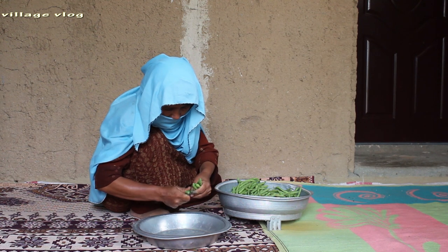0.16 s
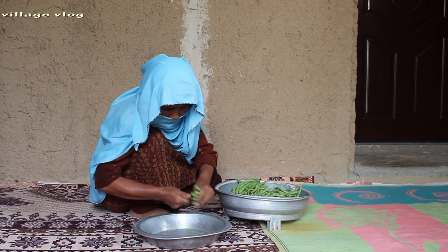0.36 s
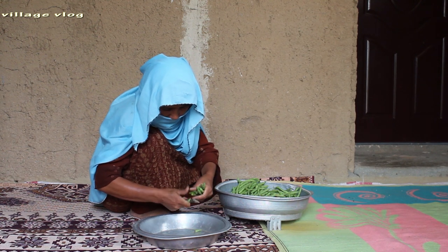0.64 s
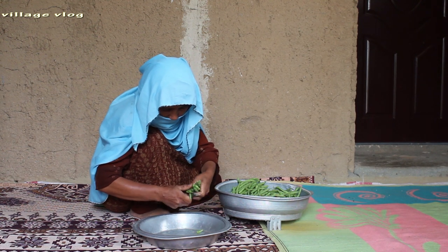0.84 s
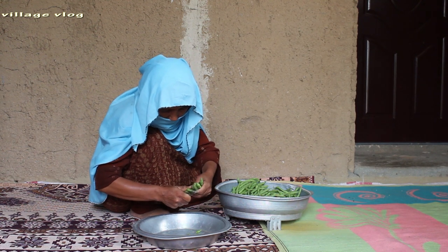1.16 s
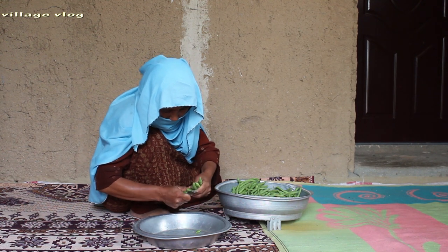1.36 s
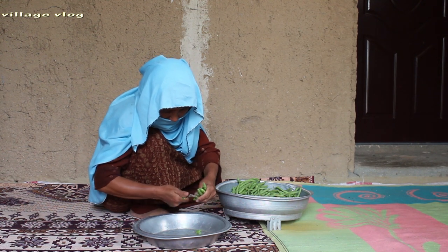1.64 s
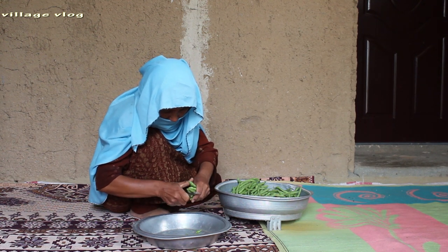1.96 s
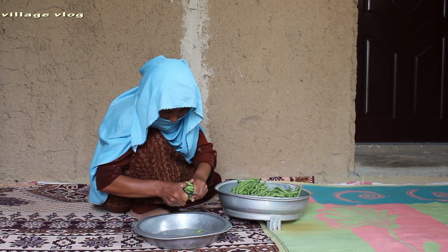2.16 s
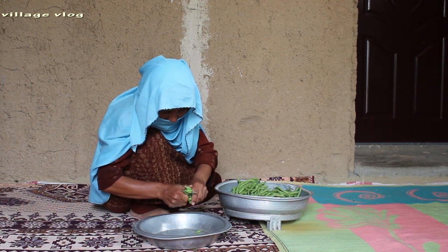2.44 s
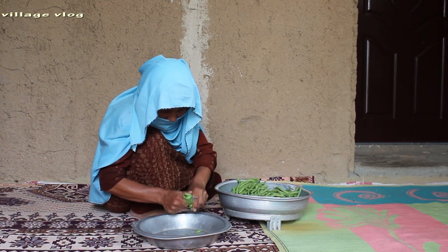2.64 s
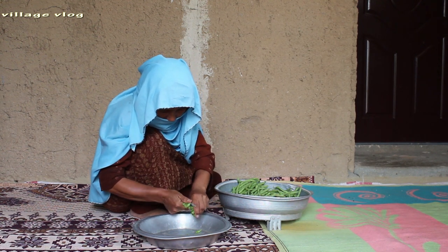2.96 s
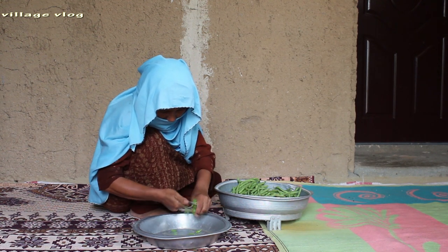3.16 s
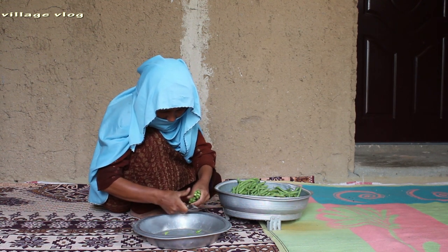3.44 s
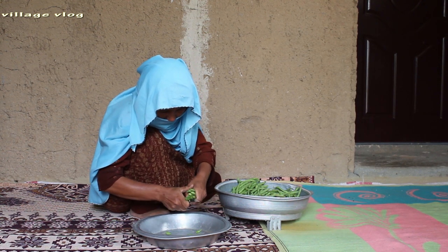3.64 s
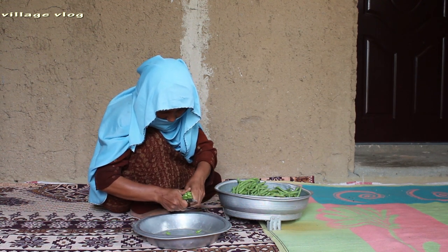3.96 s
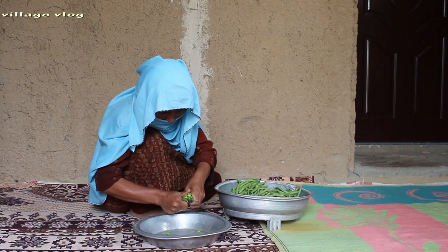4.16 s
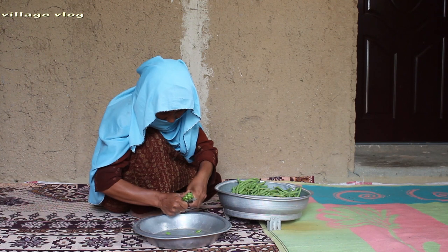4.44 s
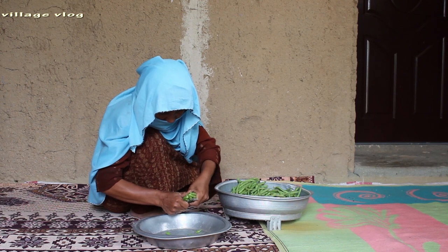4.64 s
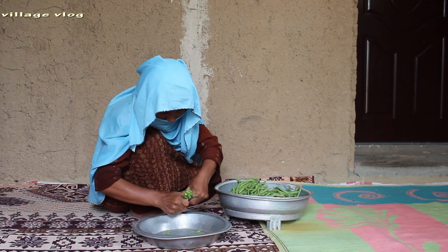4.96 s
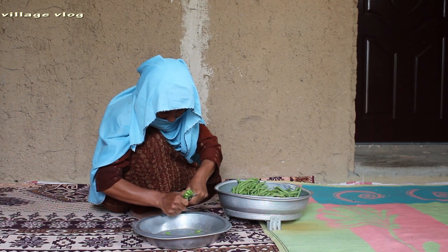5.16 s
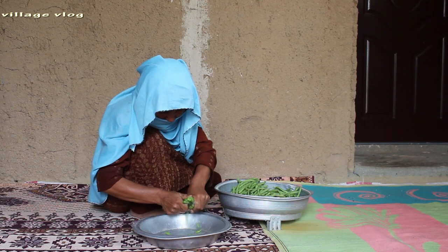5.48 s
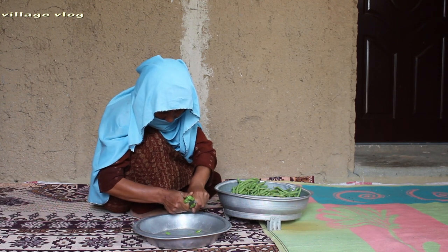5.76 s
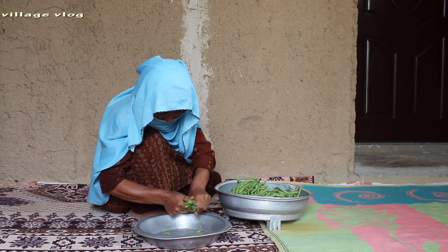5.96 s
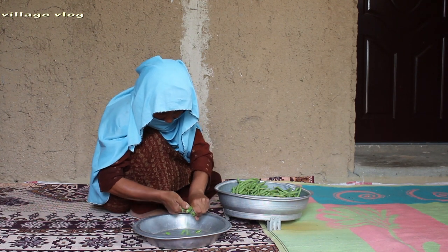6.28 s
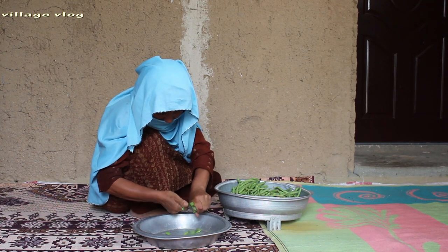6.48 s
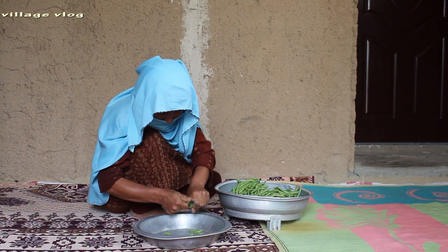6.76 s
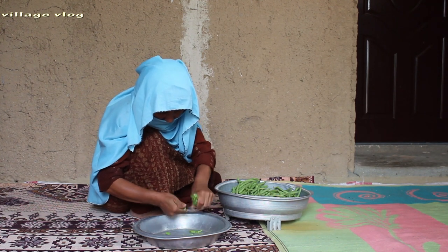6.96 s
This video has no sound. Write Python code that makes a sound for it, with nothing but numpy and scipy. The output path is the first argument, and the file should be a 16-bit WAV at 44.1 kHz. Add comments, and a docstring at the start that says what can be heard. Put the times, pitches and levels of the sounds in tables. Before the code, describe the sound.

Close, quiet outdoor porch ambience with soft air and light hiss. From 0.2 to 0.5 s several small crisp bean cracks, then a piece clinks into a wide thin metal bowl, with weak bounces and a brighter tick at 1.2. One snap at 1.5 precedes firmer hollow metallic landings at 1.65 and 1.9. A faint far motor hum wavers until about 3.8, and a tiny falling chirp comes at 2.1. Cracks gather from 2.4, a strong snap at 2.84 followed at once by the loudest clang, then cuts and tumbling pieces until 3.7, with a soft low rumble near 3.4. A lull holds a faint chirp at 3.9 and small snaps around 4.2. Crisp cuts resume at 5.1, with a solid ring at 5.3 and bounces to 5.8; a dim chirp and more cracks follow, then landings at 6.4 and 6.8. Rings are short and damped.

```python
"""A wide metal bowl rings as pieces of hand-cut green bean drop in: shared modes plus a crowd of weak ones.
Above it each pod cracks at the knife: a click and a noise burst through a broad resonance, with porch echoes.
Small fibre ticks surround the cuts. Behind lie shaped-noise air and hiss, a wavering far motor hum,
one low rumble swell and three faint, falling bird chirps."""
import sys
import numpy as np
from scipy import signal
from scipy.fft import rfft, irfft
from scipy.io import wavfile

SR = 44100
rng = np.random.default_rng(int(sys.argv[2]) if len(sys.argv) > 2 else 0)


def inscribe(sig):
    """Save sig as 16-bit PCM at rate SR to the path in sys.argv[1].

    A 1-D sig is mono; a 2-D sig holds one channel per row.
    Samples are clipped to [-1, 1] before scaling.
    """
    pcm = np.round(np.clip(np.atleast_2d(sig).T, -1, 1) * 32767)
    wavfile.write(sys.argv[1], SR, pcm.astype(np.int16))


N = 313551

# Air and hiss spectrum: (frequency [Hz], relative level [dB])
AIR_SPECTRUM = [(15, -36), (30, -2), (50, -3.5), (90, 6), (130, 1.5), (330, 4), (700, 1), (1100, -0.5),
                (2000, -2), (3200, -3.5), (6000, -7.5), (10000, -12), (15800, -10.5)]
# Air and hiss width: (frequency [Hz], side minus mid [dB])
AIR_SIDE = [(40, -40), (120, -21.5), (300, -22.5), (1000, -24), (2500, -20.5), (6000, -10), (10000, -5.5),
            (15000, -6)]
# Far motor before MOTOR_TRIM_DB: (time [s], level [dB])
MOTOR_ENVELOPE = [(0.1, -73), (1.51, -64), (2.09, -68), (2.39, -60), (2.58, -70), (3.53, -70), (3.88, -84),
                  (3.9, -96)]
# Falling chirps of a far bird, before trim: (time [s], level [dB], length [s])
BIRD_CHIRPS = [(2.148, -43.5, 0.061), (3.891, -47.5, 0.11), (5.891, -46.5, 0.094)]
# Porch tail colour: (frequency [Hz], gain [dB])
PORCH_GAIN = [(200, 1.4), (700, 6), (2500, 8.4), (5000, 3.8), (9000, 2), (15000, 3.7)]
# Porch tail decay: (frequency [Hz], t60 [s])
PORCH_T60 = [(300, 0.51), (2500, 0.26), (7000, 0.27), (14000, 0.22)]
# Colour shared by all cracking pods: (frequency [Hz], gain [dB])
POD_GAIN = [(150, -20), (500, -6.5), (1200, -11), (2200, -6), (4000, -3.5), (7000, -4), (15000, -6.5)]
# Pods cracking, before level and treble trims:
# (time [s], level [dB], crack pitch [Hz], treble [dB], nominal tearing time [ms])
POD_CUTS = [(0.179, -40.5, 3470, -6, 5.1), (0.302, -43.5, 4060, 4, 4), (0.3459, -51, 5000, 7, 2.1),
            (0.4227, -43, 4070, 1, 1.4), (0.4498, -45.5, 2960, -7, 1.7), (1.508, -40, 7960, 8, 8.8),
            (2.3607, -45, 7400, -6, 3.4), (2.4525, -43.5, 8600, -4, 6.5), (2.49, -44.5, 6040, 1, 4.1),
            (2.642, -42, 3230, -5, 2.4), (2.7247, -37, 7700, -4.5, 3.4), (2.8174, -49, 7400, 20, 2.4),
            (2.8448, -27, 3550, 2, 3.3), (3.0272, -47, 3480, 1, 0.81), (3.0631, -38.5, 2090, -9, 8),
            (3.08, -37, 2100, 11, 2.8), (3.1003, -38, 4500, -24, 0.78), (4.1223, -42, 2130, -20, 0.88),
            (4.185, -49, 4400, 1, 1.7), (4.226, -42.5, 4570, 4, 5.5), (5.1216, -40, 7800, 8, .83),
            (5.177, -36, 4400, 2.5, 1.5), (5.227, -34, 3640, -3, 0.97), (5.304, -35, 7200, -2, 0.73),
            (5.472, -43, 8100, -4.5, 0.33), (5.9747, -35.5, 6900, -2.5, 5.5), (6.203, -35, 3980, -9, 1.7),
            (6.276, -42, 5900, 0, 3.9), (6.285, -39.5, 6000, -10, 3), (6.3463, -43, 3460, 3, 1.2)]
# Pieces landing or bouncing in the bowl:
# (time [s], level [dB], contact time [ms], low-end weight [dB], pitch favoured by the spot [Hz])
BOWL_LANDINGS = [(0.461, -25.5, 0.87, -4.5, 940), (0.659, -40, 1.31, -24, 690),
                 (0.785, -36.5, 0.17, -1, 1790), (0.892, -41.5, 0.36, -7, 1790),
                 (1.203, -35.5, 0.36, -7.5, 3680), (1.21, -29, 0.13, -12.5, 3340),
                 (1.651, -25, .63, -14, 700), (1.672, -21.5, 0.91, -7, 677), (1.819, -39, 1.7, -21, 653),
                 (1.862, -40, 0.38, 3, 1570), (1.924, -24.5, 0.69, -6, 1106), (2.115, -36.5, 0.73, -1, 734),
                 (2.868, -26.5, 0.042, -2, 1490), (2.875, -14, 0.43, -10, 1480),
                 (3.055, -25, 0.47, -16, 1250), (3.105, -31, 0.7, 3, 704), (3.184, -23.5, 1.01, -16.5, 656),
                 (3.256, -32, 1.9, -28, 690), (3.335, -35, 0.25, 7, 665), (3.353, -27, 0.85, -27, 766),
                 (3.373, -30.5, 0.11, 10, 1740), (3.457, -40.5, 0.69, 7, 740),
                 (3.495, -39.5, 0.31, 7, 1230), (3.617, -48, 0.57, -8, 700), (3.714, -51.5, 1.84, -17, 710),
                 (5.287, -19.5, 0.83, -15, 704), (5.408, -30.5, 1.02, -1, 690),
                 (5.507, -26, 0.89, -30, 1240), (5.64, -31.5, 2.11, -26, 650),
                 (5.677, -30.5, 0.46, -12, 1290), (5.833, -36, 0.64, -7, 1200),
                 (6.377, -20.5, 1.2, -19, 703), (6.439, -27.5, 0.86, -44, 680),
                 (6.517, -36, 1.97, -11, 714), (6.593, -34, 0.64, -41, 1300),
                 (6.809, -23, 0.38, -14.5, 1330), (6.94, -41, 0.65, -11, 1290)]
# Clear bowl modes; t60 before the sustain factor: (frequency [Hz], relative level [dB], t60 [s])
CLEAR_MODES = [(287, -26, .7), (304, -20.5, 1.05), (392, -10, .4), (437, -15, .35), (469, -14, .35),
               (547, -9.5, .35), (625, -7, .35), (693, 0, .5), (711, -5, .35), (769, -4, .4),
               (806, -6, .35), (831, -7, .35), (912, -8, .4), (958, -7, .4), (1018, -9, .35),
               (1048, -9, .35), (1084, -7, .35), (1154, -7.5, .35), (1307, -8, .35), (1385, -7, .35),
               (1446, -4, .4), (1490, -3, .4), (1789, -7, .45), (1802, -3, .45), (2055, -9, .3),
               (2400, -13, .3), (2700, -13, .3), (3140, -8, .33), (3526, -4.5, .38)]
# Colour of the bowl's knock and weak modes: (frequency [Hz], gain [dB])
BOWL_GAIN = [(50, -54), (130, -31), (220, -52), (320, -18.5), (420, -9.5), (550, -2), (720, 1.5),
             (1000, -1.5), (1500, -0.5), (2000, 1), (2700, -2.5), (3500, -4), (5000, -1.5), (8000, -14),
             (15000, -29)]
# Decay of the weak modes: (frequency [Hz], t60 [s])
WEAK_MODE_T60 = [(300, 0.61), (800, 0.52), (2000, 0.26), (5000, 0.19), (14000, 0.13)]

AIR_DB = -55
MOTOR_HZ, MOTOR_WAVER_RMS_HZ, MOTOR_TRIM_DB = 142, 1.18, -2
RUMBLE_AT_S, RUMBLE_PEAK_DB, RUMBLE_RISE_DB_PER_S, RUMBLE_FALL_DB_PER_S = 3.42, -60, 120, 35
CHIRP_START_HZ, CHIRP_END_HZ = 4870, 3240
# A piece that falls hard on its soft flesh slaps down flat, with more weight, then tumbles once more
HARD_FALL_DB, FLESH_MS = -27, .3
SLAP_S, SLAP_DB, SLAP_WEIGHT_DB = .012, -29.5, 10
TUMBLE_S, TUMBLE_DB = .11, -49.5
CUTOFF_HZ = 16000

RING_SIZE = 24576  # samples in one event
AGE_S = np.arange(RING_SIZE) / SR
RING_HZ = np.fft.rfftfreq(RING_SIZE, 1 / SR)
OCTAVE = np.log2(RING_HZ + 1)
TIME_S = np.arange(N) / SR
SCENE_HZ = np.fft.rfftfreq(N, 1 / SR)


def from_db(db):
    """Decibels to amplitude gain."""
    return 10 ** (np.asarray(db) / 20)


def unit_energy(x):
    """Scale to a sum of squares of 1."""
    return x / np.sqrt(np.sum(x ** 2) + 1e-20)


def rms_one(x):
    """Scale to an rms of 1."""
    return x / np.sqrt(np.mean(x ** 2) + 1e-20)


def at_hz(points, hz):
    """Interpolate a table along log frequency."""
    known_hz, values = np.transpose(points)
    return np.interp(np.log(np.maximum(hz, 1)), np.log(known_hz), values)


def add(track, s, sound):
    """Mix a sound in at a time."""
    start = max(int(round(s * SR)), 0)
    track[start:start + len(sound)] += sound[:N - start]


def causal(db):
    """Minimum-phase response with the given gains: nothing sounds before its cause."""
    cepstrum = irfft(np.log(from_db(db)))
    index = np.arange(RING_SIZE)
    fold = 1 + np.sign(RING_SIZE // 2 - index) * (index > 0)
    return np.exp(rfft(cepstrum * fold))


def dying_noise(decay, count=5):
    """Spectrum of a dense ring: noise whose bands fade at their own rates; unit energy."""
    white = rfft(rng.standard_normal(RING_SIZE))
    centres_hz = np.geomspace(500, 12000, count)
    band = np.searchsorted(np.sqrt(centres_hz[1:] * centres_hz[:-1]), RING_HZ)
    ring = np.zeros(RING_SIZE)
    for k, hz in enumerate(centres_hz):
        fade = np.exp(-np.log(1000) * AGE_S / at_hz(decay, hz))
        ring += irfft(white * (band == k)) * fade
    return rfft(unit_energy(ring))


def coloured_noise(spectrum):
    """Steady noise with a given spectrum; rms 1."""
    white = rfft(rng.standard_normal(N))
    return rms_one(irfft(white * from_db(at_hz(spectrum, SCENE_HZ)), N))


def scatter(delay_s, spread_s):
    """Spectrum of a noise burst that starts late and fades exponentially; unit energy."""
    late = np.clip((AGE_S - delay_s) / spread_s, 0, 20)
    return rfft(unit_energy(rng.standard_normal(RING_SIZE) * (late > 0) * np.exp(-late)))


def air():
    """Outdoor murmur nearly alike in both channels, under a wider hiss."""
    mid = coloured_noise(AIR_SPECTRUM)
    side = irfft(rfft(coloured_noise(AIR_SPECTRUM)) * from_db(at_hz(AIR_SIDE, SCENE_HZ)), N)
    return from_db(AIR_DB) * np.array([mid + side, mid - side])


def rumble():
    """One soft swell of low noise, rising and falling linearly in dB."""
    since_s = TIME_S - RUMBLE_AT_S
    swell_db = np.minimum(RUMBLE_RISE_DB_PER_S * since_s, -RUMBLE_FALL_DB_PER_S * since_s)
    noise = coloured_noise([(15, -27), (45, -2.5), (85, -8), (160, -22), (500, -60)])
    return from_db(RUMBLE_PEAK_DB + swell_db) * noise


def far_motor():
    """Distant motor hum: a sine whose pitch wavers slowly at random."""
    hz = MOTOR_HZ + MOTOR_WAVER_RMS_HZ * coloured_noise([(2, 0), (20, -40), (200, -120)])
    hum = rms_one(np.sin(2 * np.pi * np.cumsum(hz) / SR))
    level_db = np.interp(TIME_S, *np.transpose(MOTOR_ENVELOPE))
    return from_db(level_db + MOTOR_TRIM_DB) * hum


def bird(trim_db=-3.0, echo_s=0.038, rasp_rms_hz=450, rasp_s=0.00075):
    """Each chirp glides down with a rasp in its pitch and arrives blurred by echoes."""
    out = np.zeros(N)
    smoother = [1, -np.exp(-1 / (rasp_s * SR))]
    for s, db, length_s in BIRD_CHIRPS:
        progress = np.clip(AGE_S / length_s, 0, 1)
        rasp = rms_one(signal.lfilter([1], smoother, rng.standard_normal(RING_SIZE)))
        glide_hz = CHIRP_START_HZ + (CHIRP_END_HZ - CHIRP_START_HZ) * progress
        phase = 2 * np.pi * np.cumsum(glide_hz + rasp_rms_hz * rasp) / SR
        note = np.sin(phase) * np.sin(np.pi * progress)
        add(out, s, from_db(db + trim_db) * irfft(rfft(note) * scatter(0, echo_s)))
    return out


def porch():
    """Spectrum of the short tail that the porch gives back."""
    return dying_noise(PORCH_T60) * causal(at_hz(PORCH_GAIN, RING_HZ))


def stray_fibres(trim_db=4, spread_db=4, lag_s=0.018, scatter_s=0.039, tail_db=-7, count=4):
    """Around each cut, skin and strings of the pod give way in a few small ticks."""
    ticks = np.zeros(N)
    fade = np.linspace(1, 0, 48) ** 2
    for s, db, *_ in POD_CUTS:
        for when, size in rng.standard_normal((count, 2)):
            strength = from_db(min(db, -38) + trim_db + spread_db * min(size, 1.5))
            tick = unit_energy(rng.standard_normal(48) * fade)
            add(ticks, max(s + lag_s + scatter_s * when, 0), strength * tick)
    highpass = RING_HZ / (RING_HZ - 2500j)
    pod = causal(at_hz(POD_GAIN, RING_HZ))
    skin = unit_energy(irfft(pod * highpass * (1 + from_db(tail_db) * porch())))
    return signal.fftconvolve(ticks, skin)[:N]


def pod_cracks(trim_db=1.5, peak_db=7, peak_octaves=0.31, treble_hz=6500, treble_trim_db=-4,
               fibre_spread_db=4, first_db=-3, wall_db=-11, wall_s=0.014, wall_spread_s=0.0072,
               tail_db=-6, side_db=-14, side_spread_s=0.0015, attack_s=0.0061):
    """A pod breaks with a sharp crack and a run of bursting fibres, coloured by its hollow's resonance."""
    mid, side = np.zeros(N), np.zeros(N)
    top = RING_HZ ** 4 / (RING_HZ ** 4 + treble_hz ** 4)
    for s, db, hz, bright_db, ms in POD_CUTS:
        tear_s = 0.9 * max(ms, .5) / 1000  # time to fall to 1/e
        fibre_sizes = from_db(fibre_spread_db * rng.standard_normal(RING_SIZE))
        fibres = rng.standard_normal(RING_SIZE) * fibre_sizes
        tearing = unit_energy(fibres * np.exp(-np.minimum(AGE_S / tear_s, 10) ** 2))
        first_snap = from_db(first_db) * (AGE_S == 0)
        burst = unit_energy(tearing + first_snap)

        hollow_db = peak_db * np.exp(-((OCTAVE - np.log2(hz)) / peak_octaves) ** 2)
        pod = causal(at_hz(POD_GAIN, RING_HZ) + hollow_db + (bright_db + treble_trim_db) * top)
        crack = rfft(burst) * pod
        strength = from_db(db + trim_db) / np.sqrt(np.mean(irfft(crack)[AGE_S < attack_s] ** 2))

        echoes = from_db(wall_db) * scatter(wall_s, wall_spread_s) + from_db(tail_db) * porch()
        # Echoes gather sound from all sides of the pod: its resonance stands out less
        diffuse = pod * from_db(-.5 * hollow_db)
        add(mid, s, strength * irfft(crack + diffuse * echoes))
        # A short noise burst, opposite in the two channels and mostly treble, widens each crack
        widening = pod * np.sqrt(top) * scatter(0, side_spread_s)
        add(side, s, strength * from_db(side_db) * irfft(widening))
    return np.array([mid + side, mid - side])


def strikes():
    """Every contact with the bowl: each landing, and the slap and tumble that follow a hard fall."""
    rows = list(BOWL_LANDINGS)
    for s, db, ms, weight_db, spot_hz in BOWL_LANDINGS:
        slap_late, tumble_late = rng.uniform(-1, 1, 2)
        if db > HARD_FALL_DB and ms > FLESH_MS:
            slap_at_s = s + SLAP_S * (1 + 0.101 * slap_late)
            tumble_at_s = s + TUMBLE_S * (1 + .3 * tumble_late)
            rows.append((slap_at_s, SLAP_DB, ms, weight_db + SLAP_WEIGHT_DB, spot_hz))
            rows.append((tumble_at_s, TUMBLE_DB, ms, weight_db, spot_hz))
    return rows


def contact(ms, weight_db, roundness=1.45, shelf_hz=900):
    """Landing spectrum: a longer, softer push is duller; a light piece moves the low modes less."""
    progress = np.clip((AGE_S + .5 / SR) * 1000 / ms, 0, 1)
    push = np.abs(np.sin(np.pi * progress)) ** roundness
    spread = from_db(weight_db / 2)
    low_shelf = (1j * RING_HZ + shelf_hz * spread) / (1j * RING_HZ + shelf_hz / spread)
    return rfft(push) * low_shelf


def bowl(modes_db=-3, knock_db=-3.5, flutter_db=-2.0, flutter_s=0.016, spot_db=5, spot_octaves=0.091,
         vary_db=5.5, favour_db=2.5, sustain=0.72, detune=0.0025, attack_s=0.022):
    """Every piece strikes the same modes, with strengths that depend on the spot where it lands."""
    out = np.zeros(N)
    hz, mode_db, t60_s = np.transpose(CLEAR_MODES)
    fades = np.exp(-np.log(1000) * AGE_S / (sustain * t60_s[:, None])).astype(np.float32)
    turns = (2 * np.pi * hz[:, None] * AGE_S).astype(np.float32)
    radiated = (RING_HZ / (RING_HZ - 200j)) ** 2  # the sheet is too small to push out bass
    colour = causal(at_hz(BOWL_GAIN, RING_HZ))
    for s, db, ms, weight_db, spot_hz in strikes():
        favoured_db = favour_db * np.exp(-(np.log2(hz / spot_hz) / spot_octaves) ** 2)
        varied_db = vary_db * rng.standard_normal(len(hz))
        signs = rng.choice([-1, 1], len(hz))
        strengths = from_db(mode_db + favoured_db + varied_db) * signs
        # Beans lying in the bowl shift about and load each mode a little differently
        load = (1 + detune * rng.standard_normal((len(hz), 1))).astype(np.float32)
        rings = strengths @ (np.cos(turns * load) * fades)

        # The knock runs to the rim and back as a flutter, then spreads into weak modes
        spot = causal(spot_db * np.exp(-((OCTAVE - np.log2(spot_hz)) / spot_octaves) ** 2))
        flutter = from_db(flutter_db) * scatter(0, flutter_s)
        spreading = from_db(knock_db) + flutter + dying_noise(WEAK_MODE_T60)
        crowd = unit_energy(irfft(colour * spot * spreading))

        body = crowd + from_db(modes_db) * unit_energy(rings)
        hit = irfft(rfft(body) * radiated * contact(ms, weight_db))
        attack_rms = np.sqrt(np.mean(hit[AGE_S < attack_s] ** 2))
        add(out, s, from_db(db) * hit / attack_rms)
    return out


def scene():
    """Sum of all sources; only air and pod cracks differ between the channels."""
    background = air() + rumble() + far_motor() + bird()
    return background + stray_fibres() + pod_cracks() + bowl()


def record(dry):
    """Steep elliptic low-pass."""
    lowpass = signal.ellip(12, .1, 80, CUTOFF_HZ, fs=SR, output="sos")
    return signal.sosfilt(lowpass, dry)


dry = scene()
out = record(dry)
inscribe(out)
```